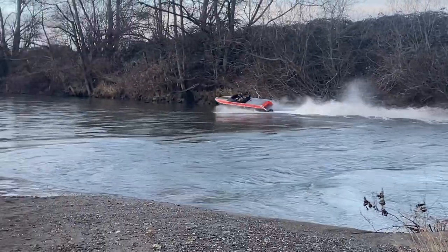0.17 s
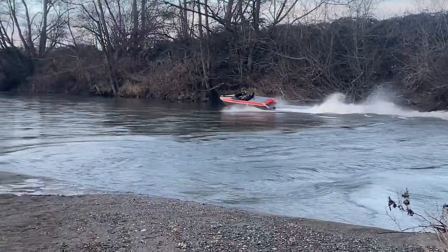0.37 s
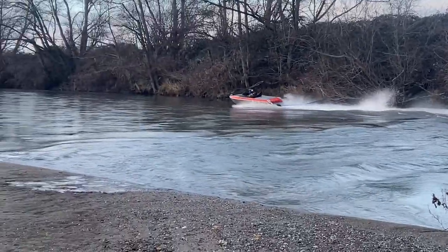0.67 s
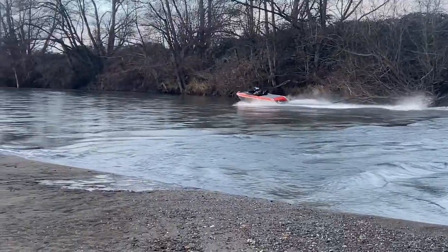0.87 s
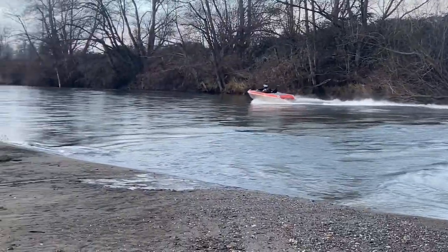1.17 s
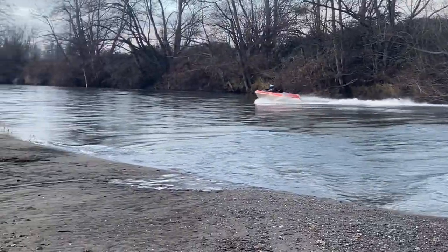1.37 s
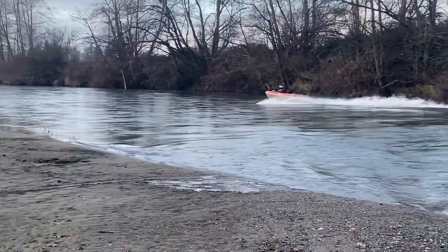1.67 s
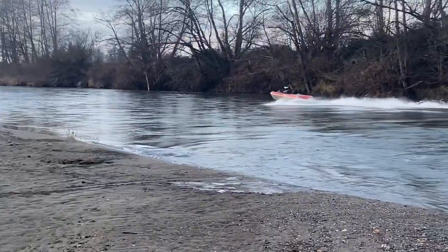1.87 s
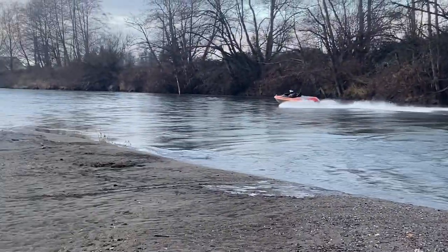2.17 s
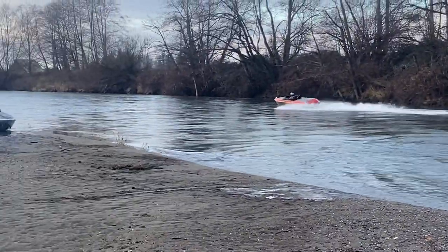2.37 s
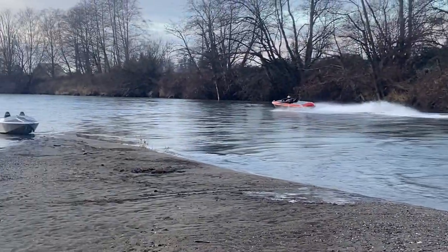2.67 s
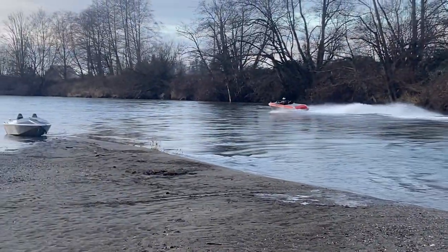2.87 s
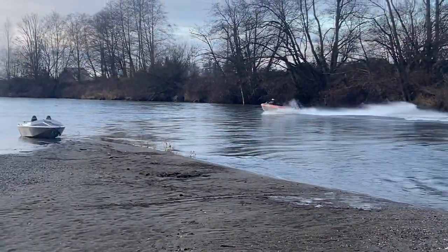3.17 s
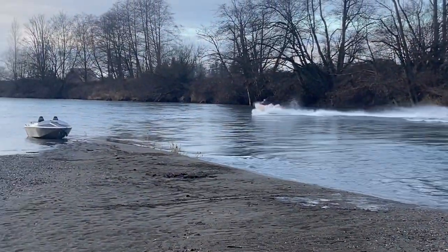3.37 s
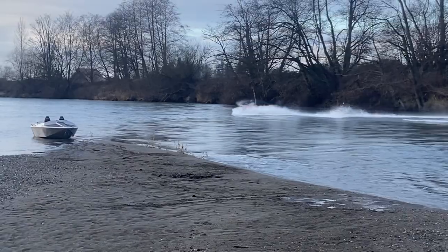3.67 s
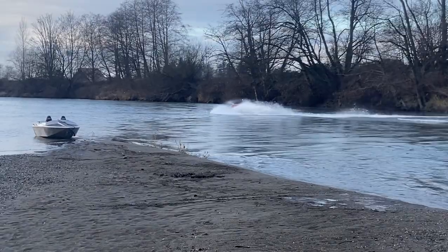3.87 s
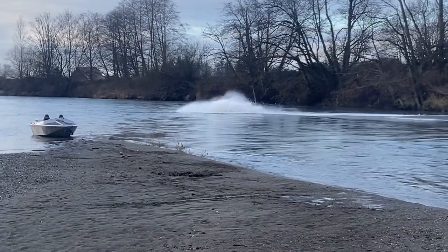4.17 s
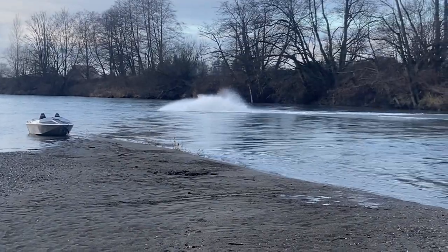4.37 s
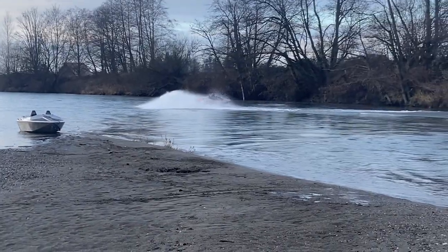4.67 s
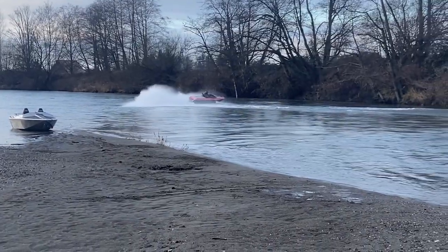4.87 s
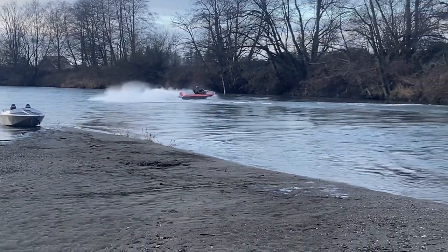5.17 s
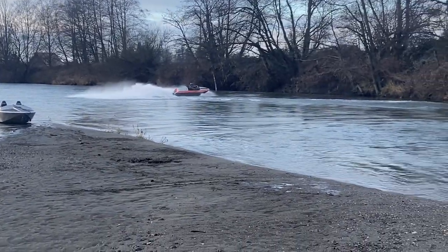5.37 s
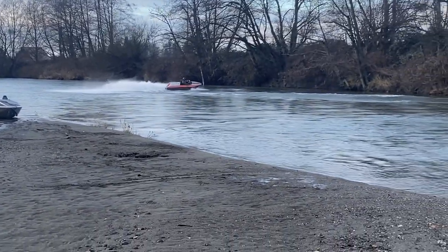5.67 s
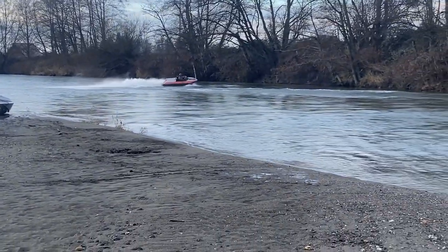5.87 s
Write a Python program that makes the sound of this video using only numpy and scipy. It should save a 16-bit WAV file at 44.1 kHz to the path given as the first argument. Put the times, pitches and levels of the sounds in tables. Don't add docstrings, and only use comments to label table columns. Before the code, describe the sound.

A small jet boat runs along the far side of a river, heard from the near bank on a phone. From 0 to 2.7 s its exhaust is a low, raspy, nearly steady drone around 145 Hz, swelling around 1.5 s and thinning around 2.3 s, with fluttering overtones over soft wash hiss and lumpy wind rumble. At about 2.8 s the throttle opens: the note leaps to nearly 200 Hz, loud and growling, wavering until 3.45 s. It drops abruptly at 3.5 s to around 150 Hz, then climbs again from 3.75 s, holding a strong strained note near 190 Hz from 4.4 to 4.75 s while thrown spray hisses in bursts and low thumps quicken. By 5 s it falls to a steadier drone near 156 Hz, spray thinning, continuing to the end at 6 s. Faint bank echoes blur it.

```python
import sys
import numpy as np
from scipy import signal
from scipy.io import wavfile
from scipy.ndimage import uniform_filter1d

SR = 44100
rng = np.random.default_rng(int(sys.argv[2]) if len(sys.argv) > 2 else 0)


def volts_from_db(level):
    exponent = np.asarray(level, float) / 20
    return 10 ** exponent


def materialize(psi):
    bounded = np.clip(np.atleast_2d(psi).T, -1, 1)
    quanta = np.round(bounded * 32767).astype(np.int16)
    wavfile.write(sys.argv[1], SR, quanta)


N = 265923

# t/s, firing note/dB, exhaust turned towards the bank/dB, engine load/0-1
COURSE = [(0.0, -25, 0, 0.06), (0.75, -22, 0.5, 0.06), (1.54, -15.5, -9.5, 0.22), (1.9, -20, -9, 0.23),
          (2.3, -29.5, -2, 0.09), (2.62, -18, 1.5, 0), (2.78, -16.5, 5, 0.2), (2.92, -13.5, 4.5, 0.6),
          (3.1, -8.5, 3, 0.7), (3.44, -16.5, 9, 0.8), (3.5, -16, -2, 0.07), (3.75, -14, 3.5, 0.2),
          (3.9, -21, 3.5, .95), (4.04, -17, 6.5, 0.73), (4.49, -9.5, 1, 1), (4.75, -12.5, 1.5, 1),
          (5.0, -16, -10.5, 0.74), (6.03, -18, -8.5, 0.44)]


def evened(x):
    return x / np.sqrt(np.mean(np.abs(x) ** 2) + 1e-20)


def at_samples(t, values):
    return np.interp(np.arange(N) / SR, t, values)


def curves(rows):
    t, *columns = np.transpose(rows)
    return [at_samples(t, column) for column in columns]


def drift(low_hz, high_hz):
    t = np.arange(N // 256 + 2) * 256 / SR
    slow = 0
    for f in np.geomspace(low_hz, high_hz, num=20):
        slow = slow + np.sin(2 * np.pi * (f * t + rng.random())) / np.sqrt(f)
    return at_samples(t, evened(slow))


def dents(rows):
    t = np.arange(0, N + 64, 64) / SR
    shape = np.ones(len(t))
    for middle_s, half_s, db in rows:
        nearness = np.clip(1 - abs(t - middle_s) / half_s, 0, 1)
        shape *= 1 + (volts_from_db(db) - 1) * nearness
    return at_samples(t, shape)


def noise(colour, patchy_db, flicker_db, size, apart=None):
    # f/Hz, difference against sum/dB, share of it tied to the sum/0-1, its phase/rad
    mic_pair = [(30, -23.5, .1, 0), (90, -13, .1, 0), (160, -7.5, .6, 0), (450, -16.5, .7, -.2),
                (800, -12.5, 0.77, -.6), (1300, -4, .85, -1.0), (1750, 0, .7, -1), (2050, -22, .5, 0),
                (2600, -15.5, .3, 0), (3100, -12, .3, 1.5), (3500, -19.5, .3, 1.5), (3800, -48, .3, 1.5),
                (4800, -49.5, .3, 1.5), (7000, -50, .5, -1.57), (8120, -0.5, .9, -1.57),
                (11300, -5, .8, -1.57), (13000, -39.5, .8, -1.57), (15000, -45.5, .7, -1.57)]
    hop, bin_hz = size // 4, np.fft.rfftfreq(size, 1 / SR)
    colour_hz, colour_db = np.transpose(colour)
    used = (bin_hz > colour_hz[0]) & (bin_hz < colour_hz[-1])
    log_hz = np.log(bin_hz[used])
    shape_db = np.interp(log_hz, np.log(colour_hz), colour_db)

    a, b, c, d, patches = rng.standard_normal((N // hop + 5, used.sum(), 5)).T
    flicker = evened(uniform_filter1d(patches.sum(0), size=3))
    patches = uniform_filter1d(uniform_filter1d(patches, size=9, axis=0), size=12, axis=1)
    moving_db = patchy_db * evened(patches) + flicker_db * flicker

    pair_hz, *pair = np.transpose(mic_pair)
    side_db, tied, turn = (np.interp(log_hz, np.log(pair_hz), column)[:, None] for column in pair)
    if apart:
        apart_hz, apart_db = np.transpose(apart)
        side_db = (np.interp(log_hz, np.log(apart_hz), apart_db) - shape_db)[:, None]
    tied = np.clip(tied, 0, 1)
    mid = a + 1j * b
    side = volts_from_db(side_db) * (tied * np.exp(1j * turn) * mid + np.sqrt(1 - tied ** 2) * (c + 1j * d))

    spectra = np.zeros((2, len(bin_hz), a.shape[1]), complex)
    spectra[:, used] = np.array([mid, side]) * volts_from_db(shape_db[:, None] + moving_db)
    mid, side = signal.istft(spectra, nperseg=size, noverlap=size - hop)[1][:, :N]
    return np.array([mid + side, mid - side]) / np.sqrt(np.mean(mid ** 2))


def wind():
    # f/Hz, level/dB per Hz
    rumble = [(22, -46), (35, -22.5), (50, -10), (65, 2.5), (100, 0.5), (125, 0), (160, -1), (220, -30.5)]
    # t/s, half width/s, level at the middle/dB
    gusts = [(0.0, 0.075, 6), (.56, 0.13, 12), (.88, 0.18, 4), (1.31, .08, 4), (1.5, .1, 1),
             (1.75, 0.056, -16), (2.4, 0.12, 0.5), (2.62, .08, 5), (2.82, 0.058, 3), (.25, 0.047, -7.5),
             (.7, .05, -6), (1.25, .04, -8), (3.35, .04, -5.5), (3.95, .25, 0), (3.02, 0.063, 8),
             (3.16, 0.063, 6), (3.29, 0.036, 5), (3.46, 0.14, 8.5), (3.61, 0.066, 6), (3.78, 0.15, 6.5),
             (4.38, 0.067, 8), (4.53, 0.059, 5), (4.63, 0.07, 7), (4.76, 0.079, 9.5), (4.87, .04, -11),
             (4.94, 0.071, 9), (5.14, .06, 8.5), (5.68, 0.34, 3.5), (5.76, 0.047, -11), (5.86, 0.054, 7)]
    calm_db, hull_s, hull_db = -38, 2, 5
    hull = np.clip((np.arange(N) / SR - hull_s) / .4 + .5, 0, 1)
    return volts_from_db(calm_db + hull_db * hull) * dents(gusts) * noise(rumble, patchy_db=-1.5, flicker_db=1.0, size=2048)


def thrown():
    # start t/s, length/s, level/dB, fineness (0 wash, 1 spray, 2 fizz)
    splashes = [(-.1, .54, 3.5, 2), (-.1, .65, 1.5, 2.04), (-.1, .9, 2.2, 2), (-.1, .55, 2, 0.6),
                (0.7, .4, -0.5, -0.2), (1.0, 0.71, -0.5, 1.2), (1.95, .35, 1, .78), (2.2, .39, 0.5, .05),
                (2.85, 3.2, 1.5, 0.4), (2.86, .28, 4.5, 0.9), (3.2, .25, 2.5, 0.8), (3.35, .15, 1.5, 0.5),
                (3.5, .34, -0.5, 3), (3.82, .19, 4.5, 0.9), (3.97, .12, 1, -0.5), (4.1, .13, 4.5, 1),
                (4.3, .15, -0.5, 0.5), (4.3, .45, 2, 2.3), (4.402, .4, 1, 0.2), (4.6, .23, 2, .05),
                (4.9, .7, 1.7, 0.8), (5.0, 0.67, -2, 3.5), (5.3, .45, 1, 0), (5.65, .5, -11, 3)]
    rise_s, fall_s, reach_layers = .05, .1, 1.4
    t = np.arange(0, N + 64, 64) / SR
    layer = np.arange(3)[:, None]
    lift_db = np.zeros((3, len(t)))
    for start_s, length_s, db, fine in splashes:
        rise_and_fall = np.minimum((t - start_s) / rise_s, (start_s + length_s - t) / fall_s)
        share = np.clip(1 - (abs(layer - fine) / reach_layers) ** 2, 0, 1)
        lift_db += db * np.clip(rise_and_fall + .5, 0, 1) * share
    return np.array([at_samples(t, row) for row in lift_db])


def water():
    # f/Hz, level/dB per Hz
    wash_colour = [(1000, -23), (1500, -10), (1750, -5.5), (2280, -9), (2610, -0.5), (3100, -0.5),
                   (3800, -4.5), (4600, -11.5), (5500, -37)]
    spray_colour = [(3200, -22), (3900, -3.5), (4400, -2), (5000, 1), (6000, -3.5), (6800, -10.5),
                    (7800, -33)]
    fizz_colour = [(5200, -26.5), (6400, -7.5), (7000, -0.5), (7860, -4), (8420, -10.5), (8750, -19.5),
                   (9050, -44.5), (9400, -23), (9700, -11.5), (10200, -12.5), (11800, -17), (12350, -21),
                   (12550, -59), (14600, -70.5)]
    air_colour = [(13700, -40), (13900, -1.5), (14300, 0.5), (15000, 0.5), (15500, -2.5), (15800, -29)]
    # f/Hz, level/dB per Hz
    fizz_apart = [(5200, -58.5), (7300, -50), (7550, -11.5), (7800, -6.5), (8600, -5.5), (9400, -6.5),
                  (10200, -13), (10600, -20.5), (10900, -50), (11500, -51), (11800, -20.5), (12300, -19),
                  (13400, -19), (14200, -22.5), (14550, -49)]
    wash_db, spray_db, fizz_db = thrown() + [[-49.5], [-54], [-61]]
    air_db = fizz_db - 22.5 + .4 * (fizz_db + 58)
    wash = volts_from_db(wash_db) * noise(wash_colour, patchy_db=0.5, flicker_db=0.43, size=512)
    spray = volts_from_db(spray_db) * noise(spray_colour, patchy_db=0.8, flicker_db=0.44, size=512)
    fizz = volts_from_db(fizz_db) * noise(fizz_colour, patchy_db=-1.0, flicker_db=0.35, size=512, apart=fizz_apart)
    air = volts_from_db(air_db) * noise(air_colour, patchy_db=1.1, flicker_db=1.0, size=512)
    return wash + spray + fizz + air


def hump():
    # t/s, centre f/Hz, level/dB
    sliding_band = [(0.0, 1000, -60), (1.2, 1205, -53), (2.3, 951, -55), (2.65, 950, -53.5),
                    (2.85, 945, -44), (3.05, 1160, -48.5), (3.3, 1200, -58), (3.55, 1590, -54),
                    (3.82, 1630, -50), (4.0, 1540, -54), (4.4, 1403, -57.5), (4.7, 1326, -48.5),
                    (4.9, 1493, -53.5), (5.15, 1400, -62), (6.03, 1202, -60)]
    width_hz = 330
    centre_hz, level_db = curves(sliding_band)
    turn = np.exp(2j * np.pi * np.cumsum(centre_hz) / SR)
    r = np.exp(-np.pi * width_hz / SR)
    wide = noise([(600, 0), (2200, 0)], patchy_db=1.0, flicker_db=.5, size=512)
    ringing = turn * signal.lfilter([1], np.poly([r, r]), wide / turn)
    return volts_from_db(level_db) * evened(ringing.real)


def roar(turns):
    # t/s, roar level/dB, depth of the roar/dB
    exhaust = [(0.0, -43.5, 7.5), (1.14, -46, 5.5), (1.34, -47.5, 7), (2.47, -47, 9), (2.69, -46.5, 11),
               (2.92, -42, 10), (3.19, -45, 9), (3.5, -44, 15.5), (3.75, -44, 11.5), (4.01, -45, 12.5),
               (4.45, -44.5, 12.5), (4.75, -44.5, 14), (4.94, -48, 17), (5.21, -50, 18), (5.49, -48, 13.5),
               (5.81, -45, 10), (6.03, -44.5, 11.5)]
    # f/Hz, level/dB per Hz
    deep_colour = [(100, -20.5), (140, 3), (250, -4.5), (400, -8.5), (600, -19.5), (900, -25)]
    bright_colour = [(350, -23.5), (600, 1), (800, -2.5), (1000, -4), (1400, -10.5), (1700, -24.5),
                     (2300, -18.5), (3000, -50)]
    roar_db, depth_db = curves(exhaust)
    puffs = 1 + .12 * np.cos(2 * np.pi * turns) + .1 * np.cos(np.pi * turns)
    deep = volts_from_db(depth_db) * noise(deep_colour, patchy_db=-2.5, flicker_db=2.0, size=1024)
    bright = volts_from_db(3) * noise(bright_colour, patchy_db=1.33, flicker_db=-0.7, size=1024)
    return volts_from_db(roar_db) * puffs * (deep + bright)


def firing_note():
    # t/s, half width/s, level at the middle/dB
    first_fades = [(0.0, 0.042, -20), (.133, 0.044, -37), (.25, 0.031, -8), (.38, .08, -15.5),
                   (.66, 0.081, -7), (1.8, .08, -2.5), (2.0, 0.037, -8), (2.09, 0.047, 4.5),
                   (2.18, 0.07, -16), (2.38, .1, -6), (2.72, 0.11, -6.5), (2.86, 0.028, -22),
                   (2.98, 0.035, -3), (3.18, .07, -3.5), (3.31, .05, -12.5), (3.46, 0.015, -22),
                   (3.53, .04, -3), (2.31, .03, -9), (3.79, 0.024, -22), (3.87, 0.029, -19),
                   (4.02, 0.048, -5.5), (4.69, 0.084, -4.5), (5.52, 0.053, -3), (5.69, 0.065, -16),
                   (5.84, 0.12, -3.5), (6.03, 0.1, -25)]
    return volts_from_db(curves(COURSE)[0]) * dents(first_fades)


def whine(turns):
    tone = np.cos(2 * np.pi * 12000 * np.arange(N) / SR)
    return volts_from_db(-62) * firing_note() * tone * np.cos(2 * np.pi * turns)


def banks(x):
    level_db, t60_s, first_s = -20, .9, .04
    t = np.arange(SR) / SR
    sparse = rng.standard_normal(SR) * (rng.random(SR) < 1000 / SR)
    taps = sparse * volts_from_db(-60 * t / t60_s) * (t > first_s)
    return volts_from_db(level_db) * signal.fftconvolve(x.mean(0), taps / np.linalg.norm(taps))[:N]


def multiples():
    orders_heard = (1.5, 2, 3, 4, 5)
    # cruising level/dB, share of the turning dB, level added at full load/dB, flicker/dB
    following = [
        (-34, -0.1, -13, 2.5),
        (-30.5, 0.48, 6, 1.44),
        (-38, 1, 0.7, 1.45),
        (-46.5, 0.72, -8, 1.4),
        (-47.5, 0.31, -11, .7),
    ]
    # t/s, half width/s, level at the middle/dB
    half_fades = [(0.0, .4, -11.5), (2.2, 0.67, 3.5), (.52, 0.057, -12), (.95, 0.14, -3.5),
                  (1.35, 0.085, -7), (2.97, 0.14, -11), (.35, 0.075, 2), (.6, 0.053, 3.5),
                  (2.62, 0.025, -15), (3.35, 0.16, -5), (2.9, 0.073, -9), (3.95, .15, -6.5),
                  (4.3, 0.32, -8.5), (4.9, 0.12, 5), (5.15, 0.16, -5), (5.52, 0.29, -2), (5.95, 0.24, -6)]
    second_fades = [(.11, 0.068, -16), (.45, 0.26, -6), (.67, 0.18, -10), (.97, 0.21, 7), (1.11, 0.17, -27),
                    (1.2, 0.1, -8), (1.481, 0.053, -21), (1.72, 0.14, 6), (2.0, 0.088, -3),
                    (2.14, 0.054, -11), (2.26, 0.078, 5), (2.64, 0.16, -9), (2.73, 0.087, -30.5),
                    (2.84, 0.065, -9.5), (3.17, 0.16, -4.5), (3.34, 0.095, -21.5), (3.49, 0.1, -13.5),
                    (3.65, 0.14, 3.5), (4.23, 0.063, -12), (4.37, 0.087, 9), (4.47, 0.11, -3.5),
                    (4.75, 0.018, -10), (4.84, 0.1, -7), (5.261, 0.13, -24.5), (5.44, 0.21, -8),
                    (5.53, 0.055, -15.5), (5.68, 0.087, 2), (5.88, 0.14, -12)]
    third_fades = [(0.0, 0.082, -1), (.15, 0.091, 6.5), (0.401, 0.85, -3.5), (.85, 0.11, 6.5),
                   (1.57, 0.15, -10), (1.75, .06, -8), (1.94, 0.24, -13), (2.17, 0.25, 5.5),
                   (2.85, 0.17, -6), (3.05, .06, -13), (3.3, 0.24, -12), (3.475, 0.049, -26),
                   (3.42, 0.032, 2), (4.55, .15, 2.5), (3.54, .08, -1), (4.27, 0.056, -4.5),
                   (4.66, 0.12, -8), (4.73, .06, 2.5), (4.82, 0.16, -17), (5.18, 0.046, -15.5),
                   (4.95, 0.091, -5), (5.31, .1, 9), (5.56, 0.22, -13.5), (5.76, .15, -1.5)]
    fourth_fades = [(.2, 0.19, 8.5), (1.15, .3, 7), (0.67, 0.14, 1.5), (1.6, .15, -9.5), (2.78, .04, -12.5),
                    (5.1, 0.17, 2.5), (2.7, .08, 7), (2.98, 0.094, 13), (3.35, 0.32, 5.5),
                    (3.58, 0.15, -10), (3.05, .05, -8.5), (2.9, .04, -6), (4.25, .06, -4),
                    (4.35, 0.05, 10.5), (5.8, 0.55, 9)]
    fifth_fades = [(.15, 0.096, -9), (.45, 0.24, 1), (.85, 0.23, -0.5), (1.169, 0.046, -6.5),
                   (1.5, 0.44, 5.5), (2.93, .06, 6.5), (4.15, .1, 6), (4.7, 0.55, -6.5), (1.78, 0.089, -8),
                   (2.38, 0.4, -9), (2.76, 0.11, 7.5), (3.3, 0.12, -6.5), (3.68, 0.28, -15)]
    fades = half_fades, second_fades, third_fades, fourth_fades, fifth_fades
    _, turned_db, load = curves(COURSE)
    lines = [(1, firing_note(), 0.11)]
    for k, rows, (cruise_db, share, load_db, flicker_db) in zip(orders_heard, fades, following):
        size = volts_from_db(cruise_db + share * turned_db + load_db * load) * dents(rows)
        lines.append((k, size, flicker_db))
    return lines


def engine():
    # t/s, firing rate f/Hz
    speed = [(0.0, 143.9), (0.55, 147.6), (2.768, 144), (2.92, 184.5), (3.03, 199.5), (3.19, 182.5),
             (3.36, 195.5), (3.46, 189), (3.5, 156), (3.64, 147.5), (3.73, 153.5), (3.84, 173),
             (4.08, 184.3), (4.42, 190), (4.735, 190.5), (4.94, 162.5), (5.2, 155), (6.03, 156.6)]
    # multiple, level under the 5th/dB
    upper = [(7, -9)]
    # multiple, level under the 1.5x note/dB
    halves = [(.5, -13.5), (3.5, -16), (4.5, -21.5)]
    quarters = [(1.25, -10.5), (1.75, -14), (2.25, -19.5), (2.75, -22)]
    # t/s, half width/s, level at the middle/dB
    sixth_fades = [(.7, .7, 3), (1.15, 0.27, 7), (1.5, 0.46, -6.5), (2.0, .5, -3.5), (2.85, 0.13, 6.5),
                   (4.8, .5, -3.5), (4.15, 0.18, 7)]
    second_half_fades = [(.15, 0.36, -7.5), (2.8, .1, -6), (3.68, .2, 9.5)]

    turns = np.cumsum(uniform_filter1d(curves(speed)[0], size=1200)) / SR
    lines = multiples()
    half, fifth = lines[1][1], lines[-1][1]
    lines.append((6, fifth * volts_from_db(-6.5) * dents(sixth_fades), 1.4))
    lines.append((2.5, half * volts_from_db(-12.5) * dents(second_half_fades), 1.2))
    lines += [(k, fifth * volts_from_db(db), 1.5) for k, db in upper]
    lines += [(k, half * volts_from_db(db), 1.6) for k, db in halves + quarters]

    uneven = .06 * drift(2.5, 40)
    out = np.zeros((2, N))
    for k, size, flicker_db in lines:
        angle = 2 * np.pi * (k * turns + rng.random()) + k * uneven
        angle += .3 * (k - 1) * drift(.2, 2.5)
        size = np.sqrt(2) * size * volts_from_db(flicker_db * drift(3.0, 45))
        side = .072 * k ** .4 * np.cos(angle + .45 * drift(.6, 6))
        out += size * (np.cos(angle) + side * [[1], [-1]])
    return out + banks(out), turns


def scene():
    note, turns = engine()
    return wind() + water() + hump() + roar(turns) + whine(turns) + note


def roll_off(x):
    return signal.sosfilt(signal.butter(12, 16500, fs=SR, output="sos"), x)


def record(dry):
    return roll_off(dry)


dry = scene()
out = record(dry)
materialize(out)
```